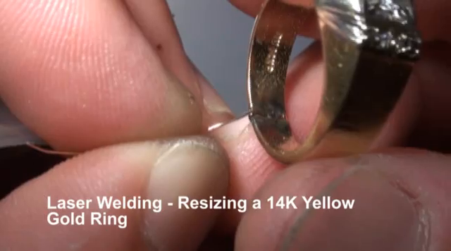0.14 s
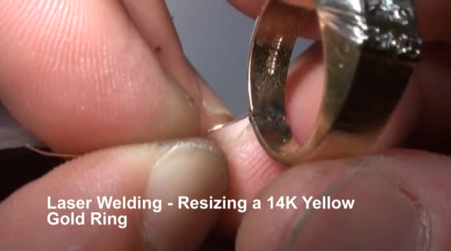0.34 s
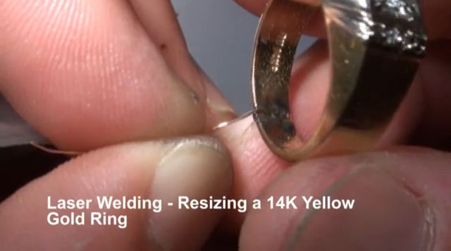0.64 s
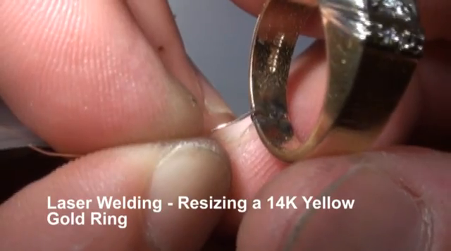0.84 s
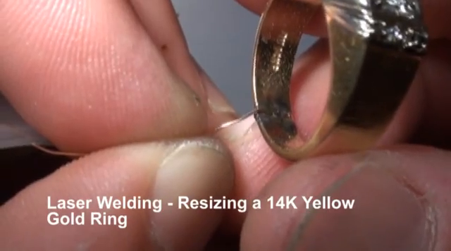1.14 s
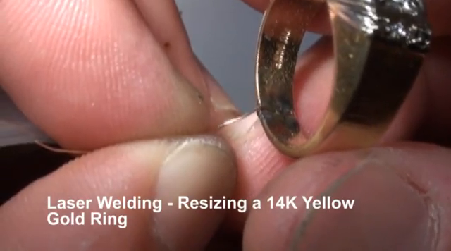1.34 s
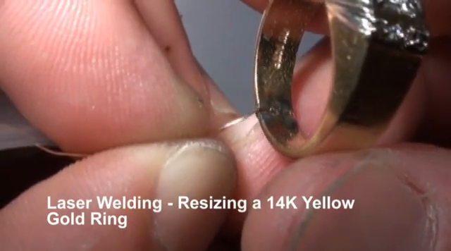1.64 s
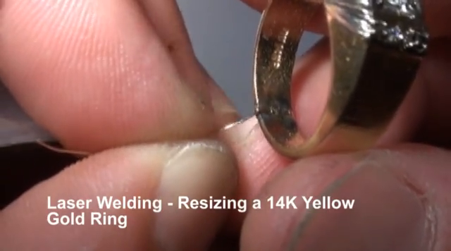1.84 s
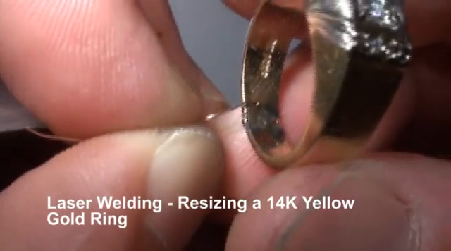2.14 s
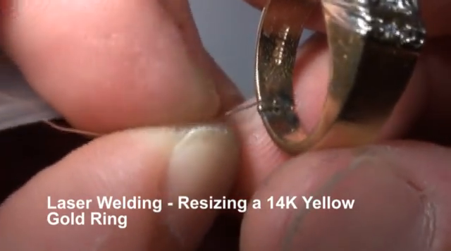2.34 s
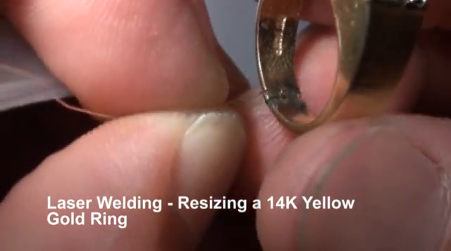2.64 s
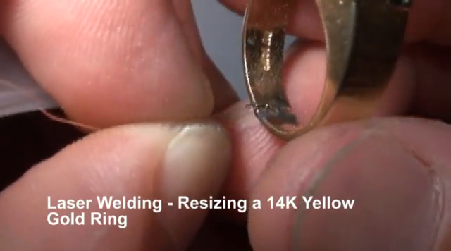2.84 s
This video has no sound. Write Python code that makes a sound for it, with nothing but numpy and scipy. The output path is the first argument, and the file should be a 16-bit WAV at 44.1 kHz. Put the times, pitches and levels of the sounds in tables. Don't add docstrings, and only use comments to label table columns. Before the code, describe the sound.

Laser welder at work: valve clacks, gas hisses over fan hum, one sharp weld tick snaps

```python
import sys
import numpy as np
from scipy import signal
from scipy.fft import rfft, irfft
from scipy.io import wavfile
from scipy.ndimage import uniform_filter1d

SR = 44100
rng = np.random.default_rng(int(sys.argv[2]) if len(sys.argv) > 2 else 0)


def pcm_store(signal):
    levels = np.round(np.clip(np.atleast_2d(signal), -1, 1) * 32767)
    wavfile.write(sys.argv[1], SR, levels.astype(np.int16).T)


def boost(x):
    u = np.asarray(x, float) / 20
    return 10 ** u


N = 132300
T = np.arange(N) / SR


def evened(x):
    return x / np.sqrt(np.mean(x ** 2) + 1e-20)


def read(points, hz):
    f, value = np.transpose(points)
    return np.interp(np.log(hz + 1), np.log(f + 1), value)


def along(rows, column):
    rows = np.array(rows, float)
    return np.interp(T, rows[:, 0], rows[:, column])


def drift(top_hz):
    rates = np.geomspace(top_hz / 20, top_hz, num=16)
    return evened(sum(np.sin(2 * np.pi * (f * T + rng.random())) / np.sqrt(f) for f in rates))


def spectral_noise(gain):
    return irfft(rfft(rng.standard_normal(N)) * gain, N)


def airflow(smooth, peaks, peaks_db, patchy_db):
    size, overlap = 1024, 768
    patches = rng.standard_normal((N // 256 + 5, size // 2 + 1))
    patches = uniform_filter1d(patches, size=10, axis=0)
    patches = evened(uniform_filter1d(patches, size=8, axis=1)).T
    hz = np.fft.rfftfreq(N, 1 / SR)
    humps = sum(boost(db + peaks_db) ** 2 / (1 + (2 * (hz - f) / w) ** 2) ** 2.2 for f, w, db in peaks)
    x = spectral_noise(np.sqrt(boost(read(smooth, hz)) ** 2 + humps))
    z = signal.stft(x, nperseg=size, noverlap=overlap)[2]
    z = z * boost(patchy_db * patches[:, :z.shape[1]])
    return evened(signal.istft(z, nperseg=size, noverlap=overlap)[1][:N])


def causal(points):
    log_gain = np.log(boost(read(points, abs(np.fft.fftfreq(2048, 1 / SR)))))
    return np.fft.ifft(np.exp(np.conj(signal.hilbert(log_gain)))).real[:1024]


# f/Hz, t60/s
REVERBERATION = [(300, 0.2), (1000, 0.54), (2100, 0.3), (3000, 0.14), (8000, 0.38), (15000, 0.26)]


def room(length):
    hz, t, z = signal.stft(rng.standard_normal(SR // 3), SR, nperseg=256)
    decay = boost(-60 * t / read(REVERBERATION, hz)[:, None])
    tail = signal.istft(z * decay, SR, nperseg=256)[1]
    tail = tail * np.minimum(np.arange(len(tail)) / SR / (0.0009 + length), 1)
    return tail / np.linalg.norm(tail)


def knocks(rows, colour, modes, room_db):
    grit_db, first_contact, onset_s = -3, 3.6, 0.00093
    out, t = np.zeros(N), np.arange(SR // 3) / SR
    ring = sum(boost(db - 60 * t / t60) * np.sin(2 * np.pi * hz * t) for hz, db, t60 in modes)
    crack = causal(colour)
    ring[:len(crack)] += crack
    for s, peak_db, length, bright_db in rows:
        envelope = np.exp(-(t / length) ** 2.5) * np.minimum(t / onset_s, 1)
        touch = rng.standard_normal(len(t)) * envelope
        grit = evened(uniform_filter1d(rng.standard_normal(len(t)), size=90))
        touch = touch * boost(grit_db * grit)
        touch[round(.0007 * SR)] += first_contact
        body = signal.fftconvolve(ring, causal([(3000, 0), (9000, bright_db)]))[:len(t)]
        direct_peak = abs(signal.fftconvolve(touch, body)).max()
        echo = boost(room_db) * np.linalg.norm(touch) * room(length)[:len(t)]
        part = out[round(s * SR):][:len(t)]
        part += boost(peak_db) / direct_peak * signal.fftconvolve(touch + echo, body)[:len(part)]
    return out


# t/s, f/Hz, level/dB
HUM_CURVE = [(0.0, 58.4, -22.5), (0.09, 59.5, -38), (0.18, 57.6, -28), (0.81, 58.1, -38.5),
             (0.99, 56.8, -26), (1.13, 56.86, -28.5), (2.1, 57.14, -23.5), (2.3, 55.9, -29),
             (2.6, 56.63, -25), (2.77, 57.17, -31), (3.0, 56.2, -28.5)]


def transformer_hum():
    phase = 2 * np.pi * np.cumsum(along(HUM_CURVE, column=1)) / SR
    return np.sqrt(2) * boost(along(HUM_CURVE, column=2)) * np.sin(phase)


# f/Hz, level/dB per Hz
FAN_COLOUR = [(70, -10.5), (150, -23.5), (350, -11.5), (900, -17.5), (2000, -28.5), (5600, -30.5),
              (7500, -45), (15800, -52.5)]
# f/Hz, width/Hz, level/dB
CABINET_MODES = [(278, 29, -6.5), (343.6, 51, 3.5), (674.5, 41.5, 4.5), (913, 17, -13.5), (1566, 195, -17),
                 (1805, 65, -16.5), (5830, 1260, -23)]
# f/Hz, level/dB
BLADE_TONES = [(404.7, -36), (883.2, -36), (925.5, -36.5), (1620, -48.5), (1852, -47)]


def fans():
    air = airflow(FAN_COLOUR, CABINET_MODES, peaks_db=-7, patchy_db=1.0)
    out = boost(-24.5 + 0.19 * drift(21)) * air
    for hz, db in BLADE_TONES:
        level = boost(db + 0.5 * drift(17.0))
        turns = np.cumsum(hz + 1.04 * drift(4.71)) / SR + rng.random()
        out += np.sqrt(2) * level * np.sin(2 * np.pi * turns)
    return out


# t/s, level/dB, buffet rate f/Hz
DRAUGHT_CURVE = [(0.0, -39, 29.9), (0.04, -61, 27.4), (0.16, -21.5, 30), (0.22, -33.5, 20),
                 (0.37, -25, 26.6), (0.59, -33.5, 29), (1.01, -25.5, 21), (1.04, -33, 29.9),
                 (1.42, -34, 24), (1.49, -31, 30.1), (2.05, -30, 26.6), (2.23, -18.5, 28.6),
                 (2.41, -18.5, 30), (2.49, -19.5, 27), (2.53, -18, 29.2), (2.57, -22, 35),
                 (2.66, -26.5, 28), (3.0, -29.5, 32.4)]


def draught():
    skirt_db = -4
    db, hz = along(DRAUGHT_CURVE, column=1), np.fft.rfftfreq(N, 1 / SR)
    push = uniform_filter1d(boost(db - db.max()), size=6000) ** 1.19
    speed = along(DRAUGHT_CURVE, column=2) * boost(2.5 * np.tanh(drift(20)))
    lumps = np.sqrt(2) * np.sin(2 * np.pi * np.cumsum(speed) / SR) * boost(1.3 * drift(25.32))
    skirt = evened(spectral_noise((hz > 45) / (1 + (hz / 75) ** 2.97))) * boost(1.3 * drift(30))
    return boost(db) * (lumps + boost(skirt_db) * push * skirt)


# t/s, peak level/dB, swing f/Hz
GUSTS = [(.146, -13.5, 30), (2.1, -16, 35), (2.138, -12.5, 36), (2.167, -8.5, 46), (2.224, -2.5, 30.26),
         (2.266, -3.5, 22), (2.294, -7, 55.1), (2.313, -5, 54.6), (2.331, -2, 59.2), (2.349, -14, 60.2),
         (2.369, -9, 45), (2.399, -22, 39.84), (2.417, -9, 45.5), (2.436, -8.5, 40), (2.46, -8, 44.84),
         (2.487, -6, 32.08), (2.51, -8, 54.6), (2.527, -11, 50), (2.563, -9, 28.25), (2.6, -18, 35)]


def thumps():
    rise_cycles, fall_cycles = 0.27, 0.68
    out = np.zeros(N)
    for s, db, hz in GUSTS:
        turns = (T - s) * hz
        shape = np.exp(-(turns / np.where(turns < 0, rise_cycles, fall_cycles)) ** 2)
        out += boost(db) * shape * np.cos(2 * np.pi * turns)
    return out


def roar():
    centre_hz, peak_s, width_s = 242, 2.223, 0.14
    ratio = np.fft.rfftfreq(N, 1 / SR) / centre_hz
    noise = evened(spectral_noise(ratio / (1 + ratio ** 2.28)))
    return boost(-26.5 + 1.2 * drift(28)) * np.exp(-((T - peak_s) / width_s) ** 2) * noise


PEDAL_ROOM_DB = -6

# f/Hz, level/dB
LINKAGE_COLOUR = [(400, -13), (1100, -10.5), (1500, 15.5), (1850, 13), (2400, -13), (5000, 6), (7500, -9.5),
                  (15800, -10)]
# f/Hz, level/dB, t60/s
LINKAGE_MODES = [(1513, -22, .03), (1680, -33, 0.02), (1790, -36, 0.011), (1880, -28, 0.028),
                 (1890, -23, 0.029)]
# t/s, peak level/dB, scrape length/s, brightness (tilt from 3 to 9 kHz)/dB
LINKAGE_HITS = [
    (1.435, -16, 0.011, -2),
    (2.016, -9, 0.019, -3),
    (2.038, -19.5, 0.013, 4),
    (2.052, -6.5, 0.018, 4),
    (2.074, -15.5, 0.014, 3),
    (2.096, -15, 0.017, 0),
    (2.127, -22, 0.025, -6),
]
# f/Hz, level/dB
SCUFF_COLOUR = [(300, 0), (700, -19), (1200, -15), (3200, 8.5), (6000, -10), (8000, -12), (12000, -8),
                (15800, -19)]
# f/Hz, level/dB, t60/s
SCUFF_MODES = [(680, -23.5, 0.042), (865, -33, 0.017)]
# t/s, peak level/dB, scrape length/s, brightness/dB
SCUFF_STROKES = [
    (1.438, -19.5, 0.025, 2),
    (1.475, -24, 0.042, -3),
    (2.02, -18, 0.094, 0),
    (2.045, -13.5, 0.07, 2.5),
    (2.1, -34, 0.19, 9),
]
# f/Hz, level/dB per Hz
PAD_COLOUR = [(6000, -30), (9000, 1), (10500, -3), (11700, -3), (12700, -2), (13600, -7), (14800, 0),
              (15800, -1)]
# f/Hz, level/dB, t60/s
PAD_MODES = [(11200, -32, 0.0043)]
# t/s, peak level/dB, scrape length/s, brightness/dB
PAD_RUBS = [
    (1.438, -20, .02, 0.0012),
    (1.462, -26, .03, 0),
    (2.051, -12, .006, 0),
    (2.058, -25, 0.034, 0),
]
# f/Hz, level/dB
SPRING_COLOUR = [(6000, -36), (9000, -6), (11000, -5), (12000, -12), (13000, 7), (13800, -6), (14800, -5),
                 (15800, -9)]
# f/Hz, level/dB, t60/s
SPRING_MODES = [(13100, -35, .004)]
# t/s, peak level/dB, scrape length/s, brightness/dB
SPRING_SQUEAKS = [
    (2.017, -17, 0.017, 0),
    (2.034, -19.5, 0.028, 0),
]


def pedal():
    rattles = knocks(LINKAGE_HITS, LINKAGE_COLOUR, LINKAGE_MODES, PEDAL_ROOM_DB)
    scuffs = knocks(SCUFF_STROKES, SCUFF_COLOUR, SCUFF_MODES, PEDAL_ROOM_DB)
    rubs = knocks(PAD_RUBS, PAD_COLOUR, PAD_MODES, PEDAL_ROOM_DB)
    squeaks = knocks(SPRING_SQUEAKS, SPRING_COLOUR, SPRING_MODES, PEDAL_ROOM_DB)
    return rattles + scuffs + rubs + squeaks


# f/Hz, level/dB
SPOT_COLOUR = [(2500, -22), (4000, -6), (5600, 7), (8000, -11), (10500, -9), (12000, -18), (15800, -24)]
# f/Hz, level/dB, t60/s
SPOT_MODES = [(5600, -46, .01)]
# t/s, peak level/dB, length/s, brightness/dB
WELD_PULSES = [
    (1.5022, -8.5, 0.0025, -7),
    (1.505, -21, 0.0021, -3),
    (2.002, -21, 0.002, -2),
    (2.348, -31, 0.0016, -14),
]


def weld_ticks():
    return knocks(WELD_PULSES, SPOT_COLOUR, SPOT_MODES, PEDAL_ROOM_DB)


# f/Hz, level/dB per Hz
GAS_COLOUR = [(590, -59), (1000, -16), (2380, -9.5), (2930, -12), (4340, -5), (5590, 2.5), (7550, -16.5),
              (10300, -23.5), (15800, -24)]
# f/Hz, width/Hz, level/dB
NOZZLE_MODES = [(2937, 280, -7), (3366, 290, -6.5), (4022, 190, -6), (4624, 270, -5.5), (5513, 42, 7),
                (5336, 170, -6), (5600, 68, 1.5), (5730, 200, -5), (6780, 110, -10), (9350, 580, -19),
                (10130, 520, -14), (10570, 340, -14.5), (12600, 440, -23), (13200, 250, -22),
                (13900, 500, -28)]
# t/s, level/dB
GAS_FLOW = [
    (.2, 1),
    (.6, 0.5),
    (1.5, 0.5),
    (2.2, 2),
    (2.33, 0.5),
    (2.405, 0.5),
    (2.425, -1),
    (2.5, -8),
]


def gas():
    open_s, shut_s, rise_s, fade_t60 = 0.2, 2.47, 0.04, 0.18
    rise = 1 - np.exp(-np.maximum(T - open_s, 0) / rise_s)
    flow_db = along(GAS_FLOW, column=1) - 60 * np.maximum(T - shut_s, 0) / fade_t60
    hiss = airflow(GAS_COLOUR, NOZZLE_MODES, peaks_db=8, patchy_db=1.2)
    return rise * boost(-27 + flow_db + 0.36 * drift(30.74)) * hiss


# f/Hz, level/dB per Hz
OPEN_COLOUR = [(300, -18), (750, -1), (2200, 6), (3600, 0), (5200, -10), (9000, -19), (12800, -21),
               (14600, -17)]
# f/Hz, level/dB, t60/s
OPEN_MODES = [(2200, -28, 0.017), (860, -43, 0.043), (1740, -38, 0.0097), (2860, -41, .015),
              (3600, -27, 0.0033)]
# t/s, peak level/dB, scrape length/s, brightness/dB
OPEN_HITS = [
    (.2095, -16.5, 0.015, 14),
    (.2245, -9, 0.0017, 4),
    (.2263, 3.5, 0.0033, -3),
    (.2285, -5, 0.0045, -4),
    (.233, -15, 0.014, 6),
    (.247, -19, 0.066, -4),
]
# f/Hz, level/dB per Hz
SHUT_COLOUR = [(200, -17), (350, 3), (1000, 7), (2100, 4.5), (3300, -1.5), (5500, -8.5), (10500, -19),
               (15800, -20)]
# f/Hz, level/dB, t60/s
SHUT_MODES = [(312, -34, 0.097), (350, -29.5, 0.08), (630, -39, 0.021), (798, -29, 0.045),
              (1030, -30, 0.026), (3250, -31, 0.0054)]
# t/s, peak level/dB, scrape length/s, brightness/dB
SHUT_HITS = [
    (2.403, -23, 0.0062, 21),
    (2.408, -2, 0.0056, 4),
    (2.412, -6, 0.0079, 10),
    (2.42, -24, 0.058, 20),
    (2.424, -11.5, 0.013, -6),
    (2.445, -15.5, 0.017, -11),
    (2.465, -22, .02, 2),
]


def valve():
    opening = knocks(OPEN_HITS, OPEN_COLOUR, OPEN_MODES, room_db=-5)
    shutting = knocks(SHUT_HITS, SHUT_COLOUR, SHUT_MODES, room_db=-11.5)
    return opening + shutting


# t/s, level/dB
RECORDER_GAIN = [
    (0, -4.5),
    (.3, -5.5),
    (1.0, -2.5),
    (2.0, -0.5),
    (2.45, -4.5),
    (3.0, -1),
]


def scene():
    mix = boost(along(RECORDER_GAIN, column=1)) * (fans() + gas()) + transformer_hum()
    mix = mix + pedal() + weld_ticks() + valve()
    lean = boost(np.array([[-.15], [.15]]))
    return mix + lean * (draught() + thumps()) + roar()


def band_limit(x):
    return signal.sosfilt(signal.butter(12, 15960, fs=SR, output="sos"), x)


def record(dry):
    vent = signal.butter(1, 8, "high", fs=SR, output="sos")
    clipped = np.clip(signal.sosfilt(vent, dry), -.95, .95)
    edge = signal.firwin(1601, 15745, window=("kaiser", 9), fs=SR)[None]
    mix = signal.oaconvolve(clipped, edge, "same")
    return band_limit(mix)


dry = scene()
out = record(dry)
pcm_store(out)
```